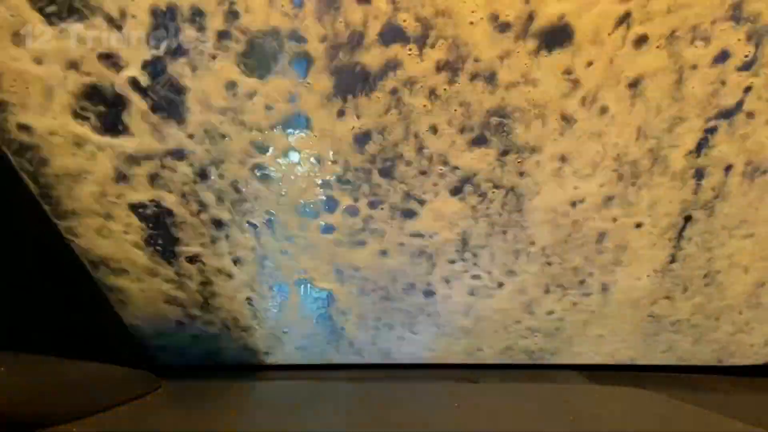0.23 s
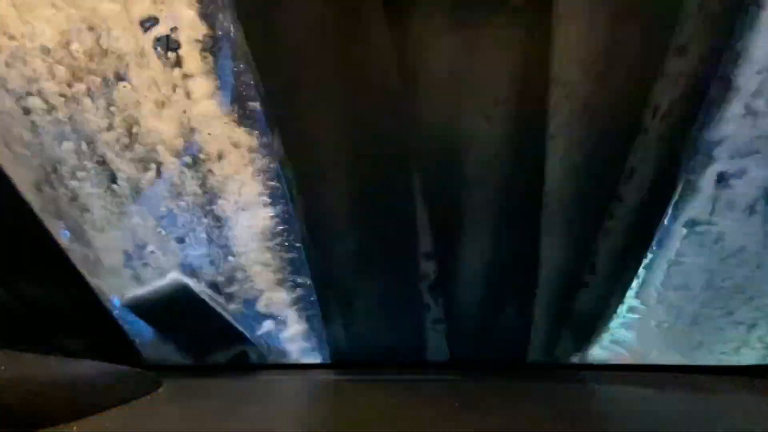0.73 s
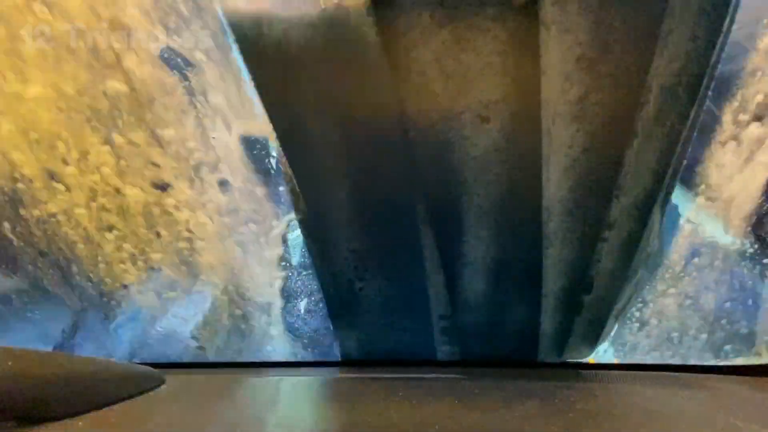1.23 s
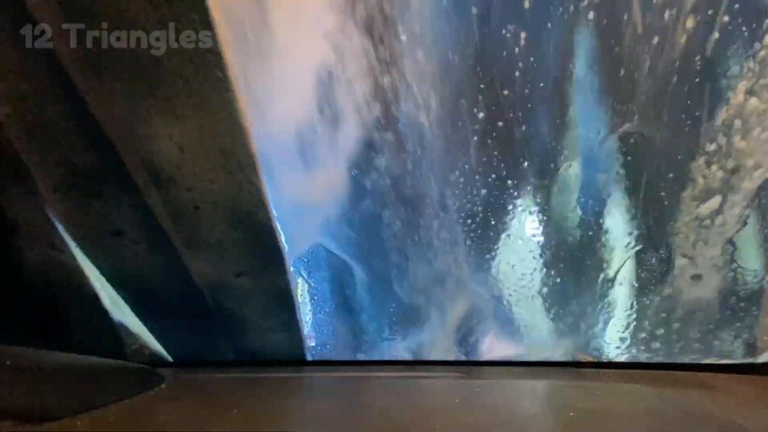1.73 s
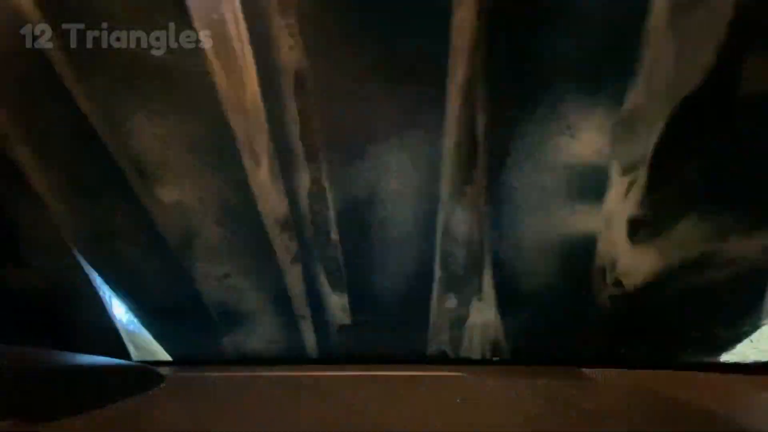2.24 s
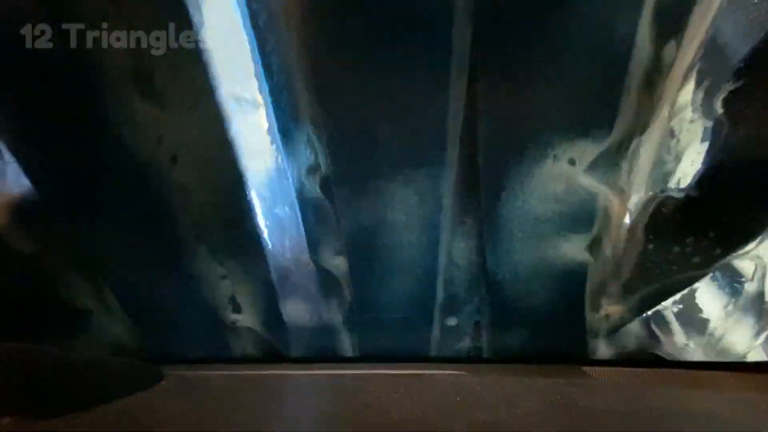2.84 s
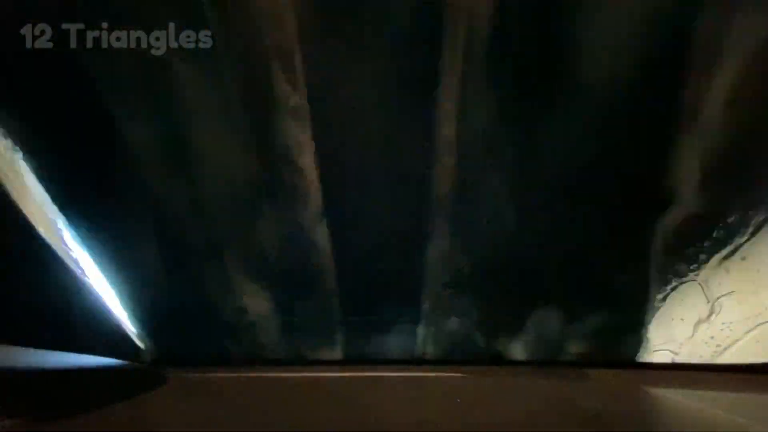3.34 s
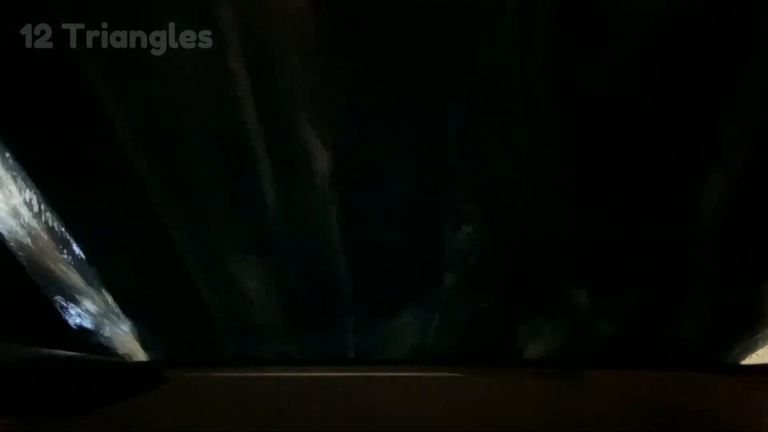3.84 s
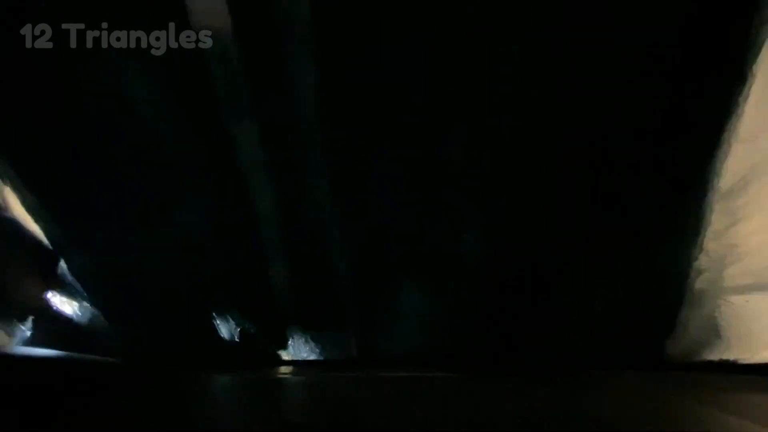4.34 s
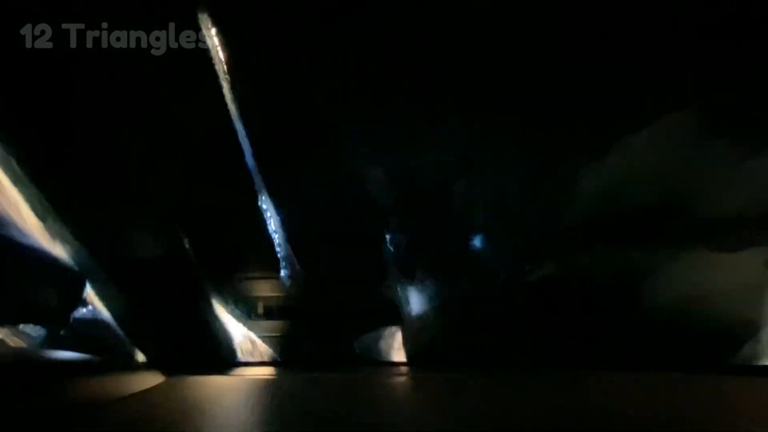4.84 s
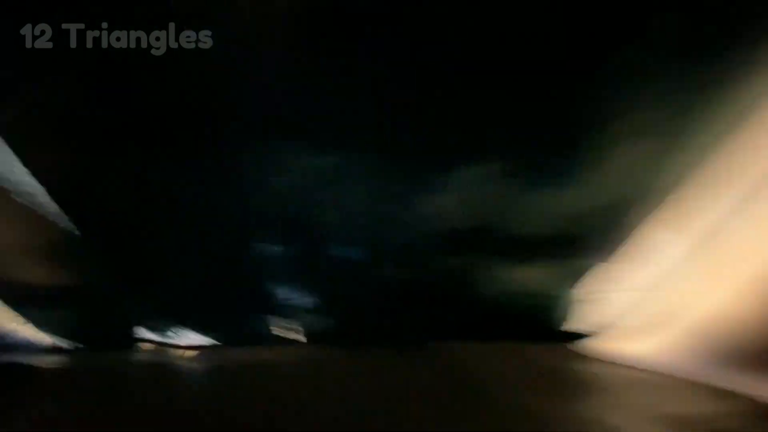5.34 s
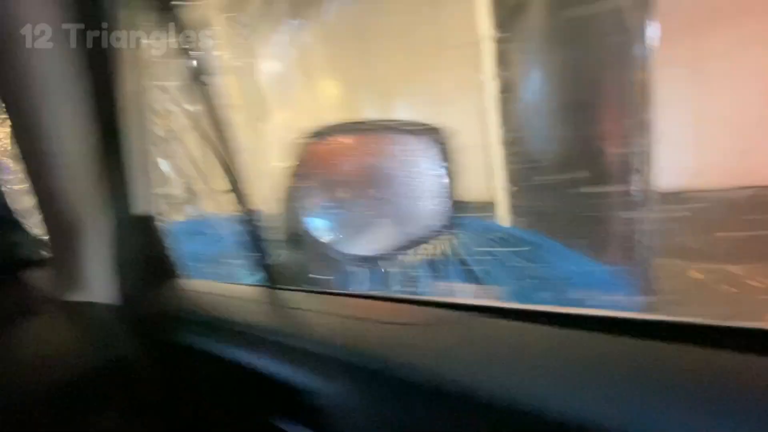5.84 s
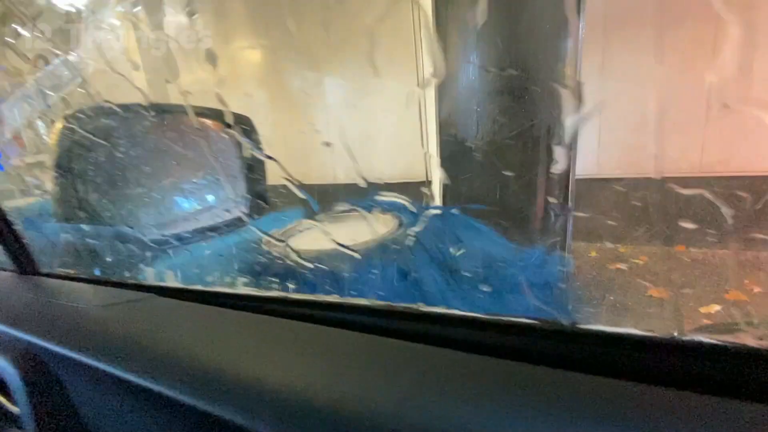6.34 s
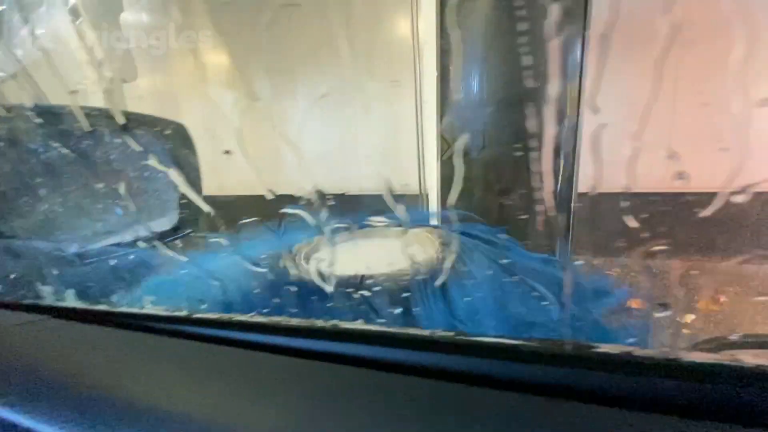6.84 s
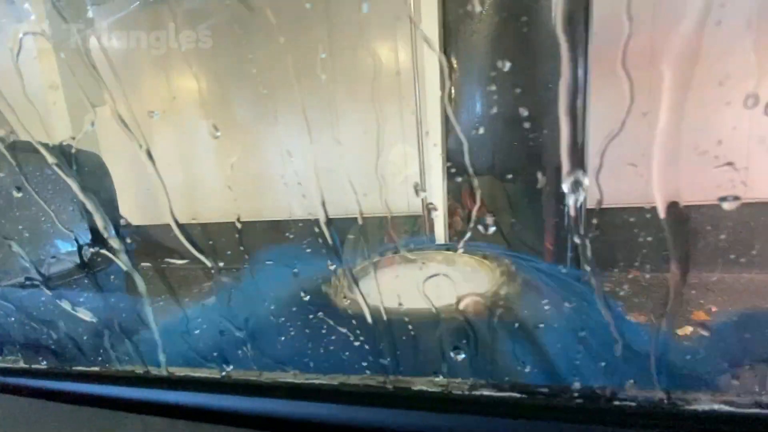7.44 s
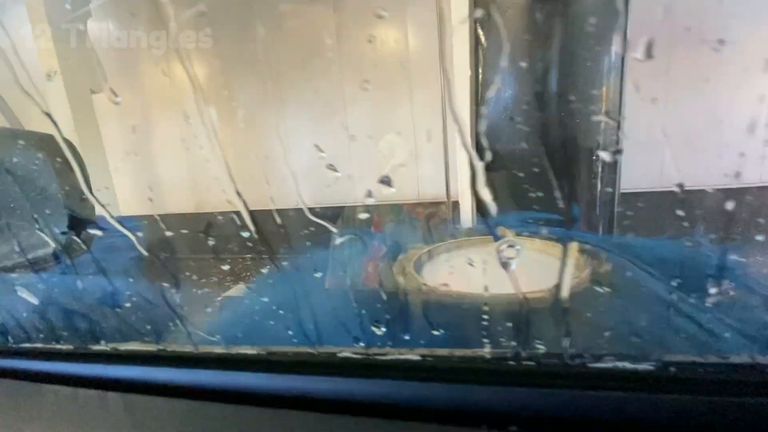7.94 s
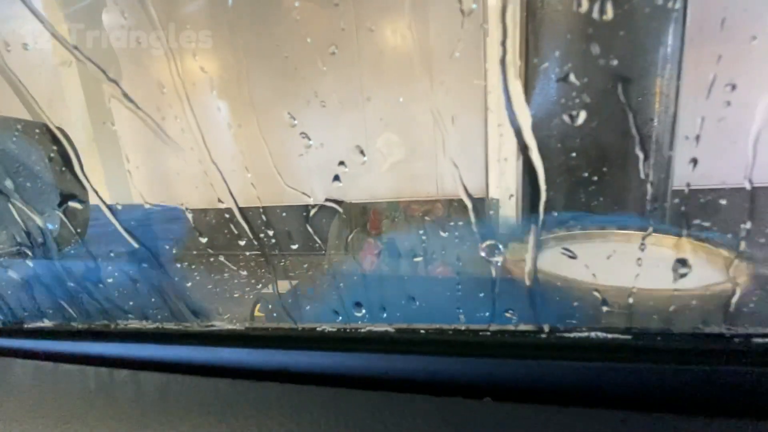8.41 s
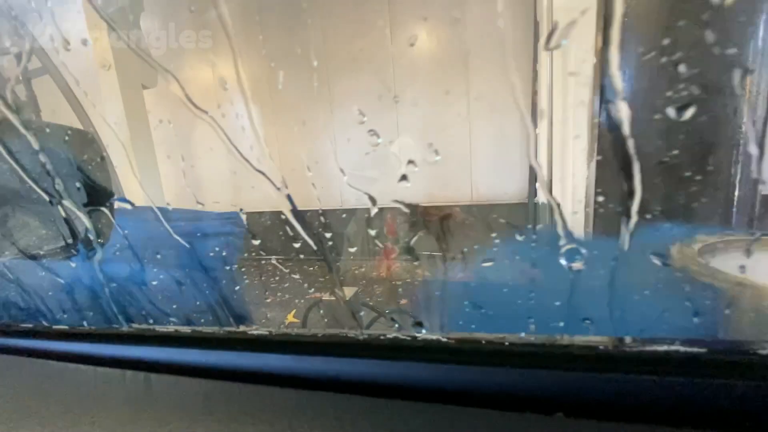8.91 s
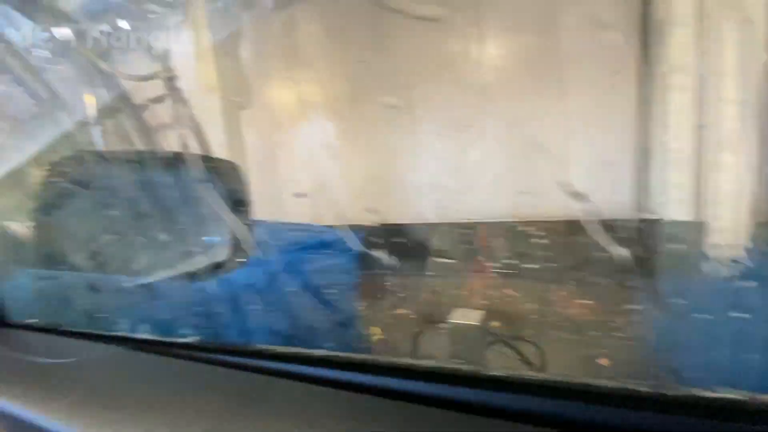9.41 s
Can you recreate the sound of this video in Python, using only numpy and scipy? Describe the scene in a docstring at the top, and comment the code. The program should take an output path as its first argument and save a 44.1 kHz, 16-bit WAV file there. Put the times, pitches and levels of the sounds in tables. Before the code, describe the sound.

From the front seat of a closed car in a tunnel car wash: muffled falling water and a faint motor whine. Heavy wet cloth strips thud onto glass and roof, smack and drag through fizzing foam, then thin out to small flicks, swishes and low roof growls. A side brush rubs the front wing with a rising hollow tone, then drums, booms and scrubs on the door, growing to a loud peak near the end.

```python
"""A drone and falling water, dulled by a closed car in a tunnel car wash: filtered noise and a wavering sine.
Heavy wet cloth strips drag in foam (noise and droplet bursts), thud (falling sweeps) and smack (noise bursts);
flicks crack on the glass, sliding cloth swishes up in pitch and the roof growls.
A side brush then rubs the front wing (two rising resonances) and drums on the door, 520 strand strikes a second,
with booming, hissing and scrubbing that briefly swells (short noise bursts)."""
import sys
import numpy as np
from scipy import signal
from scipy.fft import rfft, irfft, next_fast_len
from scipy.io import wavfile
from scipy.ndimage import uniform_filter1d

SR = 44100
rng = np.random.default_rng(int(sys.argv[2]) if len(sys.argv) > 2 else 0)


def wav_record(signal):
    """Record a signal, one row per channel, as 16-bit PCM in the file named by sys.argv[1]."""
    frames = np.transpose(np.atleast_2d(signal))
    bounded = np.clip(frames, -1, 1)
    # unit amplitude maps onto the largest positive 16-bit level
    quanta = np.round(bounded * 32767).astype(np.int16)
    wavfile.write(sys.argv[1], SR, quanta)


N = 426447
TIME = np.arange(N) / SR
PADDED = next_fast_len(N + 8192)
BINS_HZ = np.maximum(np.arange(PADDED // 2 + 1) * SR / PADDED, 1)

# Water falling in the tunnel, base level: (time [s], level [dB])
WATER_LEVEL = [(0.0, -50), (0.44, -44), (1.63, -41.5), (2.61, -45), (3.04, -47.5), (3.57, -46.5),
               (5.29, -46), (5.55, -51), (5.95, -50), (6.17, -48), (6.9, -46.5)]
# Drag of the strips on the car, base level: (time [s], level [dB])
DRAG_LEVEL = [(0.0, -51), (0.25, -37), (0.38, -38.5), (0.88, -34), (1.54, -34), (2.4, -42.5), (2.71, -41),
              (4.23, -56), (4.57, -52.5), (4.78, -66), (5.35, -54), (5.55, -54.5), (5.92, -53.5),
              (6.05, -47), (6.25, -49.5), (6.69, -50.5), (6.9, -48)]
# Thin high hiss, base level: (time [s], level [dB])
HISS_LEVEL = [(0, -68.5), (1.53, -67), (2.35, -69), (2.72, -61.5), (3.32, -67.5), (3.85, -64), (4.0, -54.5),
              (4.06, -69.5), (4.5, -66.5), (4.72, -58), (4.85, -68), (6.6, -68), (9.67, -72)]
# Wet cloth meeting glass: (time [s], clap level [dB], spray level [dB], length [s])
SMACK_EVENTS = [(0.211, -26.5, -36.5, 0.036), (0.225, -26.5, -35.5, 0.036), (0.3208, -26.5, -33, 0.0083),
                (0.749, -18.5, -25, 0.026), (0.807, -20.5, -47, 0.026), (1.298, -24.5, -44, 0.0078),
                (1.393, -21, -28, 0.016), (1.405, -26.5, -29.5, 0.033), (1.435, -16.5, -30.5, 0.023),
                (1.454, -23, -31, 0.044), (1.549, -18.5, -30.5, 0.016), (1.79, -34, -39, 0.017),
                (1.917, -18.5, -30, 0.011), (1.927, -27, -32.5, 0.044), (2.005, -40, -31.5, 0.01),
                (2.071, -34, -45, 0.0088), (2.083, -46, -52, 0.05), (2.155, -37, -45, 0.02),
                (2.176, -24.5, -23, 0.005), (2.676, -27.5, -32, 0.027), (2.692, -34.5, -46.5, 0.14),
                (2.847, -40.5, -48, 0.045), (3.201, -33.5, -41, 0.043), (3.389, -29.5, -38.5, 0.031),
                (3.896, -39, -56, 0.15), (3.952, -37.5, -56, 0.021), (4.126, -36.5, -58, 0.014),
                (4.251, -41, -43, 0.065), (4.532, -39, -62, 0.013), (4.628, -34, -42.5, 0.018),
                (5.045, -36.5, -80, 0.17), (5.353, -44.5, -53, 0.02), (6.206, -36.5, -52, 0.044),
                (6.593, -41, -48.5, 0.024), (6.635, -41, -50, 0.016), (8.245, -34, -34, 0.048),
                (8.877, -34, -40, .03)]
# Strips landing on glass and roof, and (from 7 s) the side brush's first heavy blows on the door: (time [s],
# level [dB], first pitch [Hz], panel pitch [Hz], length [s])
THUD_EVENTS = [(0.212, -24, 885, 618, 0.032), (0.249, -5, 208, 59, 0.028), (0.321, -25.5, 690, 110, .015),
               (0.539, -21, 307, 144, 0.029), (0.75, -6.5, 1280, 58.4, 0.042),
               (1.101, -20, 324, 225, 0.015), (1.302, -22, 1133, 920, 0.0099),
               (1.404, -13, 403, 177, 0.033), (1.439, -11.5, 976, 134, 0.018),
               (1.476, -12.5, 298, 58, 0.04), (1.547, -22.5, 1464, 60.3, 0.1), (1.93, -26, 1490, 92, 0.041),
               (2.675, -15.5, 710, 397, 0.011), (2.69, -26, 400, 179, 0.026),
               (2.711, -23, 198, 41.7, 0.097), (3.379, -21, 150, 51, 0.01), (5.433, -27, 1190, 49, 0.018),
               (5.712, -27, 970, 42, 0.037), (7.031, -13.5, 484, 73, 0.026), (7.098, -7, 292, 46, 0.017)]
# Water and cloth hems flicking the glass: (time [s], level [dB], tilt above 1500 Hz [dB/octave])
FLICK_EVENTS = [(0.322, -36, -9), (0.807, -14, -7), (.858, -39.5, -4.5), (1.069, -38, -4),
                (2.03, -36, -7.5), (2.175, -32.5, -5), (3.233, -42.5, 6), (3.396, -34, 10),
                (4.254, -25, 18.5), (4.304, -33, 15), (4.634, -39.5, 11), (5.274, -47, -4),
                (5.623, -43, -4.5), (7.186, -38.5, -6), (7.68, -33, -8), (8.238, -26, -4.5),
                (8.325, -30, -6), (8.876, -28, -5.5), (8.962, -27, -8), (9.638, -30, -5.5)]
# Cloth sliding over wet glass: (time [s], level [dB], length [s], first pitch [Hz], last pitch [Hz])
SWISH_EVENTS = [(2.545, -52, 0.095, 1700, 2020), (2.64, -45, 0.025, 1890, 2090),
                (3.337, -48, 0.047, 2000, 2470), (3.91, -55, 0.11, 1650, 1790),
                (4.06, -53.5, 0.067, 1600, 1950), (4.52, -49, 0.02, 1670, 1980),
                (4.565, -47, 0.032, 1590, 1910), (4.716, -56, 0.039, 1620, 2110),
                (5.058, -50.5, 0.17, 1000, 2140), (5.658, -60, 0.38, 1650, 1950),
                (6.418, -54, 0.084, 1197, 1830)]
# Cloth stuttering on the roof: (time [s], level [dB], mean pitch [Hz], length [s])
GROAN_EVENTS = [(3.512, -32, 51.7, 0.23), (3.907, -30.5, 100, 0.061), (5.093, -26.5, 45.4, 0.12),
                (6.084, -33, 63.4, 0.081), (6.72, -30, 135.2, 0.4)]
# Brush rubbing the front wing: (time [s], level [dB])
WING_LEVEL = [(5.93, -75), (6.04, -46), (6.24, -39.5), (6.42, -50.5), (6.6, -41), (6.9, -40.5),
              (7.04, -32.5), (7.45, -36), (7.64, -33), (7.85, -39), (8.3, -70)]
# Brief swells in the brush's scrubbing: (time [s], level [dB])
SCRUB_SWELL_EVENTS = [(7.303, -23), (7.454, -24), (7.627, -19), (7.692, -24), (7.919, -22), (8.101, -23),
                      (8.208, -17.5), (8.51, -15), (9.132, -21), (9.152, -21), (9.349, -21), (9.467, -19)]

# Filter shapes, all: (frequency [Hz], relative gain [dB])
RUMBLE_SHAPE = [(20, -25), (36, -25), (52, 10.5), (75, 0.5), (110, -6.5), (170, -10), (400, -58)]  # car body
WASH_SHAPE = [(150, -4.5), (340, -12), (450, 1), (520, -1), (630, 5.5), (730, -4.5), (950, -2.5),
              (1100, -7), (1340, -18), (1560, -8.5), (1900, -30.5), (2800, -59), (6000, -53)]  # falling water
RUB_SHAPE = [(60, -1), (120, 3.5), (200, 1), (270, 1), (335, -3), (420, 4), (540, -11.5), (900, -11.5),
             (2000, -53.5)]  # cloth on panels, and the knock of a thud
FIZZ_SHAPE = [(700, 5), (1500, 1), (2400, 5.5), (3700, 3), (5000, 0.5), (6500, -5), (7700, -15.5),
              (11000, -49), (14000, -40)]  # foam
THIN_SHAPE = [(5000, -15), (7750, -17.5), (8150, -0.5), (9000, -3.5), (10200, -7.5), (11500, -14),
              (12800, -33), (15000, -30)]  # high hiss
SMACK_SHAPE = [(80, 3), (250, 0.5), (450, -2.5), (650, 6), (800, 0.5), (1020, 2), (1350, -11), (2200, -21),
               (5000, -51)]  # cloth clap
SPRAY_SHAPE = [(600, -20), (1500, 6), (2000, -0.5), (3500, -2), (5500, -10), (7600, -20), (9000, -19.5),
               (11500, -33), (14000, -58)]  # squeezed-out drops
FLICK_SHAPE = [(400, -19), (1200, -6.5), (2800, 2.5), (5800, 1), (7600, -3.5), (8600, 3), (11000, -10),
               (13000, -32), (15000, -22)]  # cracks, before the tilt
BOOM_SHAPE = [(18, -16), (30, -27), (45, 5), (62, 2.5), (80, 6), (100, 1), (130, -38), (250, -33),
              (600, -95)]  # lowest door modes
DOOR_SHAPE = [(50, -43), (85, 0), (120, 4), (155, 6), (192, 0), (245, 7), (275, 0), (315, -12), (420, -16),
              (700, -40), (2000, -100)]  # drummed door
SCRUB_SHAPE = [(30, -43), (200, -21), (320, -1), (390, 3), (460, 4.5), (525, 0.5), (640, 4), (770, -6.5),
               (900, -5), (1080, -9), (1450, -22.5), (3000, -79), (9000, -94)]  # strands on the door
BRUSH_SPRAY_SHAPE = [(700, -1.5), (1500, 2.5), (2100, 2), (3400, -1.5), (4800, -5), (5700, -14.5),
                     (6800, -13), (7800, -23), (11500, -25), (14000, -50)]  # wet strand tips

# Side against mid: (frequency [Hz], gain [dB])
WIDTH = [(500, -60), (800, -26), (1100, -13), (1350, -6), (1800, -3.5)]
# Left against right channel: (frequency [Hz], left minus right [dB])
BALANCE = [(650, 0), (1000, 1), (2800, 2), (5000, 1), (7000, -2), (8500, -10), (11000, -7), (13000, 0)]
# Pitch above which the stereo image widens: (time [s], frequency [Hz])
SPREAD_FROM = [(2.0, 754), (2.5, 472), (2.9, 356), (3.15, 356), (3.5, 790), (8.6, 866), (9.2, 510),
               (9.67, 370)]
# Further phase lead of left over right: (frequency [Hz], lead [rad])
TREBLE_LEAD = [(1200, 0), (1480, 1), (2100, 4), (2750, 1), (3800, -1.6), (4800, 1), (6600, 4.1),
               (7400, 4.6), (8100, 7.3), (9300, 7.3), (10300, 4.6)]

SPREAD_RAD, CUTOFF_HZ = 2.1, 15200
MOTOR_HZ, MOTOR_DB = 582.3, -57  # centre values
# Longer contact, softer start: least rise, added rise at the typical length
SHARPEST_S, RISE_S, TYPICAL_S = 0.0016, 0.0011, 0.036
FLICK_S = 0.006
# Level at the usual drag, and share of the drag's dB swing
USUAL_DRAG_DB = -44
FIZZ_DB, FIZZ_SHARE = -56.5, 0.89
RUMBLE_DB, RUMBLE_SHARE = -46.5, 0.15
WING_START_HZ, WING_END_HZ = 608, 676
# Brush touches the door, leans to full weight, comes abreast, slides off
ARRIVAL_S, GRAZE_S, LEAN_S, ABREAST_S, LEAVING_S = 6.85, 0.15, 0.2, 9.14, 9.2
LEAVING_FADE_DB_PER_S = 9.5  # boom, rasp and whine
# Base level abreast [dB], loss per squared second away from abreast [dB/s^2]
BRUSH_BOOM, BRUSH_DRUM = (-19, 6.5), (-19.5, 1.64)
BRUSH_SCRUB, BRUSH_HISS = (-25.5, 2.6), (-42, 1.2)
# Throb of the lopsided brush: rate, a moment of greatest pressure, depth
THROB_HZ, THROB_PEAK_S, THROB_DB = 7.65, 9.195, 1.3


def from_db(db):
    """Decibels to gain."""
    return 10 ** (np.asarray(db) / 20)


def rms_one(x):
    """Scale to unit power."""
    return x / np.sqrt(np.mean(x ** 2) + 1e-20)


def gain_curve(rows):
    """Gain over time, interpolated in dB."""
    s, db = np.transpose(rows)
    return from_db(np.interp(TIME, s, db))


def at_hz(points, hz):
    """Read a curve on a log-frequency axis."""
    f, value = np.transpose(points)
    return np.interp(np.log(hz), np.log(f), value)


def colour(x, shape):
    """Filter by a fixed shape."""
    return irfft(rfft(x, PADDED) * from_db(at_hz(shape, BINS_HZ)), PADDED)[..., :N]


def sine(hz):
    """Sine of moving frequency."""
    return np.sin(2 * np.pi * np.cumsum(hz) / SR)


def drift(rate_hz):
    """Smooth random curve of unit rms: noise through two equal poles at rate_hz."""
    r = np.exp(-80 * np.pi * rate_hz / SR)  # runs at SR / 40
    white = rng.standard_normal(N // 40 + 2002)
    slow = signal.lfilter([1], [1, -2 * r, r * r], white)[2000:]
    return np.interp(np.arange(N) / 40, np.arange(len(slow)), rms_one(slow))


def noise():
    """Two unrelated white noises."""
    return rng.standard_normal((2, N))


def stereo(pair, shape):
    """Two sounds as mid and side, narrow in the bass and wide in the treble; unit rms."""
    mid = colour(pair[0], shape)
    side = colour(colour(pair[1], shape), WIDTH)
    return rms_one(np.array([mid + side, mid - side]))


def low_pass(x, hz):
    """Second-order Butterworth low-pass."""
    return signal.sosfilt(signal.butter(2, hz, fs=SR, output="sos"), x)


def droplets(per_s, spread_db, share):
    """Bursts of uneven size, power decaying over 1 ms, mixed with smooth hiss by power share."""
    sizes = from_db(spread_db * np.minimum(rng.exponential(1, N), 4))
    hits = (rng.random(N) < per_s / SR) * sizes ** 2 + 1e-18
    power = signal.lfilter([1], [1, -np.exp(-1000 / SR)], hits)
    share = np.clip(share, 0, 1)
    return noise() * np.sqrt(1 - share + share * power / power.mean())


def burst(t, rise_s, length_s, cabin_db=-17, cabin_t60_s=0.2):
    """A contact swells and dies with a Gaussian fall; the padded cabin adds a tail."""
    tail = from_db(cabin_db - 60 * t / cabin_t60_s)
    return (1 - np.exp(-t / rise_s)) * np.hypot(np.exp(-(t / length_s) ** 2), tail)


def add(track, s, sound):
    """Mix a sound in at a time."""
    start = round(s * SR)
    track[..., start:start + sound.shape[-1]] += sound[..., :N - start]


def following_drag(db, share):
    """Gain that takes a share of the drag's dB swing."""
    return from_db(db) * (gain_curve(DRAG_LEVEL) / from_db(USUAL_DRAG_DB)) ** share


def tunnel(wash_db=2.5, surge_db=1.0):
    """Body rumble, falling water dulled by the closed body, and a wavering motor whine."""
    rumble = following_drag(RUMBLE_DB, RUMBLE_SHARE) * rms_one(colour(rng.standard_normal(N), RUMBLE_SHAPE))
    surge = from_db(wash_db + surge_db * drift(16))
    water = surge * gain_curve(WATER_LEVEL) * stereo(noise(), WASH_SHAPE)
    whine = from_db(MOTOR_DB + 3.5 * drift(4)) * sine(MOTOR_HZ + 15 * drift(22))
    return rumble + water + whine


def dragging(rub_db=1, hiss_db=6.0):
    """Cloth sticks and slides on panels as foam bursts; one random grip flutters rub, foam and hiss."""
    grip = from_db(1.5 * drift(9))
    rub = from_db(rub_db) * gain_curve(DRAG_LEVEL) * stereo(noise(), RUB_SHAPE)
    foam = following_drag(FIZZ_DB, FIZZ_SHARE) * stereo(droplets(1000, 1.0, 0.19), FIZZ_SHAPE)
    hiss = from_db(hiss_db) * gain_curve(HISS_LEVEL) * stereo(droplets(450, 2.4, 0.51), THIN_SHAPE)
    return grip * (rub + foam + hiss)


def crackle(spread_db, ring_s, count=24000):
    """Bursting drops and foam cells: tiny decaying pings, each with its own pitch, size and side."""
    when, pitch, size, side = rng.random((count, 4)).T
    t = TIME[:SR // 250]
    hz = 900 + 11000 * pitch[:, None]
    pings = from_db(spread_db * size[:, None]) * np.exp(-t / ring_s) * np.sin(2 * np.pi * hz * t)
    at = (when * N).astype(int)[:, None] + np.arange(len(t))

    def mix(weight):
        """Sum the weighted pings at their times."""
        return rms_one(np.bincount(at.ravel(), (pings * weight).ravel(), N)[:N])

    return np.array([mix(1), mix(side[:, None] - 0.5)])  # mid, side


def smacks(snap=0.57, snap_s=0.007, mist_db=-4):
    """Wet cloth claps on the glass fold by fold and squeezes out a crackling spray."""
    clap, spray, t = np.zeros(N), np.zeros(N), TIME[:SR // 3]
    for s, clap_db, spray_db, length_s in SMACK_EVENTS:
        rise_s = SHARPEST_S + RISE_S * (length_s / TYPICAL_S) ** 2
        shape = burst(t, rise_s, length_s)
        # the leading edge lands hardest
        add(clap, s, from_db(clap_db) * shape * (1 + snap * np.exp(-t / snap_s)))
        add(spray, s, from_db(spray_db) * shape)
    folds = rms_one(from_db(1.5 * drift(130)))
    drops = crackle(spread_db=16, ring_s=0.0012) + from_db(mist_db) * noise()
    return folds * (clap * stereo(noise(), SMACK_SHAPE) + spray * stereo(drops, SPRAY_SHAPE))


def thuds(spread_s=0.00452, knock_db=-12):
    """High bending waves run faster: each blow sweeps down towards the panel's note."""
    out, blows, t = np.zeros(N), np.zeros(N), TIME[:SR // 3]
    for s, db, first_hz, panel_hz, length_s in THUD_EVENTS:
        hz = panel_hz + (first_hz - panel_hz) / (1 + t / spread_s) ** 2
        swell = from_db(db) * burst(t, 0.0038, length_s, cabin_db=-23, cabin_t60_s=0.96)
        add(out, s, swell * sine(hz))
        add(blows, s, swell * first_hz / 1000)
    # the many higher panel modes blur into a dull knock
    return out + from_db(knock_db) * blows * rms_one(colour(rng.standard_normal(N), RUB_SHAPE))


def flicks():
    """Water and hems crack on the glass: short noise bursts, each with its own treble tilt."""
    out, t = np.zeros((2, N)), TIME[:SR // 5]
    hz = np.maximum(np.fft.rfftfreq(len(t), 1 / SR), 1)
    octaves = np.log2(np.maximum(hz / 1500, 1))
    for s, db, tilt_db in FLICK_EVENTS:
        tone = from_db(at_hz(FLICK_SHAPE, hz) + tilt_db * octaves)
        mid, side = rfft(rng.standard_normal((2, len(t)))) * tone
        side = side * from_db(at_hz(WIDTH, hz))
        crack = rms_one(irfft(np.array([mid + side, mid - side]), len(t)))
        add(out, s, from_db(db) * crack * burst(t, 0.0009, FLICK_S, cabin_db=-9, cabin_t60_s=0.1))
    return out


def swishes(width=0.33, catch_db=5.5):
    """A strip slides faster and louder, catching as it goes, until its hem slips off: rising noise bands."""
    out = np.zeros((2, N))
    for s, db, length_s, first_hz, last_hz in SWISH_EVENTS:
        along = np.linspace(0, 1, round(length_s * SR))
        friction = low_pass(rng.standard_normal((2, SR)), width * first_hz)[:, :len(along)]
        phase = 2 * np.pi * np.cumsum(first_hz + (last_hz - first_hz) * along) / SR
        swell = np.sqrt(np.interp(along, [0, 0.7, 1], [0, 1, 0]))
        add(out, s, from_db(db) * swell * rms_one(friction * np.cos(phase)))
    return out * from_db(catch_db * np.tanh(drift(70)))


def groans(waver=0.114):
    """Slow, uneven stick and slip makes the roof growl: low sines of wavering pitch and level."""
    out, t = np.zeros(N), TIME[:SR]
    for s, db, hz, length_s in GROAN_EVENTS:
        growl = sine(hz * (1 + waver * drift(25)[:len(t)]))
        add(out, s, from_db(db) * burst(t, length_s / 2, length_s) * growl)
    return out * from_db(4 * np.tanh(drift(25)))


def wing(half_width_hz=58, lower_ratio=0.74, lower_db=-5):
    """The rubbed front wing sings in two broad resonances, rising as the brush nears the door."""
    hz = np.interp(TIME, [WING_LEVEL[0][0], WING_LEVEL[-1][0]], [WING_START_HZ, WING_END_HZ])
    phase = 2 * np.pi * np.cumsum(hz) / SR
    # slow complex noise on a carrier is a noise band
    upper, lower = low_pass(noise() + 1j * noise(), half_width_hz)
    upper = upper * np.exp(1j * phase)
    lower = from_db(lower_db) * lower * np.exp(1j * lower_ratio * phase)
    return gain_curve(WING_LEVEL) * from_db(1.5 * drift(8)) * rms_one((upper + lower).real)


def strands(per_s, uneven_db):
    """Loosely spaced tip strikes of uneven force, each spread by the door as a falling bending wave."""
    jitter, force, sign = rng.standard_normal((10000, 3)).T
    at = ((np.arange(len(jitter)) + jitter) * SR / per_s).astype(int)
    inside = (at >= 0) & (at < N)
    strikes = from_db(uneven_db * force) * np.sign(sign)
    clicks = np.bincount(at[inside], strikes[inside], N)
    t = TIME[:SR // 25]
    sweep = sine(50 + 1500 / (1 + t / 0.00223) ** 2) * np.exp(-t / 0.0055)
    # only the phase of the sweep: delay without colour
    delay = np.exp(1j * np.angle(rfft(sweep, PADDED)))
    return irfft(rfft(clicks, PADDED) * delay, PADDED)[:N]


def passing(db, loss_db):
    """Gain of a brush sound: its dB falls with the square of the time from abreast."""
    return from_db(db - loss_db * (TIME - ABREAST_S) ** 2)


def brush(motor_db=-12, lurch_db=0.5):
    """Strands drum on the door and boom its lowest modes; wet tips scrub and hiss; a motor whines."""
    tips, far_tips, bunching = strands(520, 1.7), strands(700, 1.7), drift(25)
    leaving = from_db(-LEAVING_FADE_DB_PER_S * np.maximum(TIME - LEAVING_S, 0))
    scrub = passing(*BRUSH_SCRUB) * leaving
    # the heavy door sways at a fairly even height
    sway = colour(tips, BOOM_SHAPE)
    sway = rms_one(sway / np.sqrt(uniform_filter1d(sway ** 2, size=SR // 12) + 1e-12))
    boom = passing(*BRUSH_BOOM) * leaving * from_db(lurch_db * drift(2.7)) * sway
    drum = passing(*BRUSH_DRUM) * from_db(0.085 * bunching) * rms_one(colour(tips, DOOR_SHAPE))
    rasp = scrub * from_db(0.5 * bunching) * stereo([tips, far_tips], SCRUB_SHAPE)
    spray = stereo(droplets(640, 1.7, 0.05), BRUSH_SPRAY_SHAPE)
    hiss = passing(*BRUSH_HISS) * from_db(1.35 * bunching) * spray
    whine = from_db(motor_db + 2 * drift(0.34)) * scrub * sine(MOTOR_HZ + 3 * drift(11.2))
    # outer strands graze the door before the bulk leans on it
    graze = np.clip((TIME - ARRIVAL_S) / GRAZE_S, 0, 1)
    lean = np.clip((TIME - ARRIVAL_S) / LEAN_S, 0, 1) ** 4
    throb = from_db(THROB_DB * np.cos(2 * np.pi * THROB_HZ * (TIME - THROB_PEAK_S)))
    return lean * throb * (boom + drum) + graze * (rasp + hiss + whine)


def scrub_swells(length_s=0.0063):
    """The brush's scrubbing swells briefly: short scrub-coloured noise bursts."""
    swell = np.zeros(N)
    for s, db in SCRUB_SWELL_EVENTS:
        add(swell, s, from_db(db) * burst(TIME[:SR // 5], SHARPEST_S, length_s))
    return swell * stereo(noise(), SCRUB_SHAPE)


def cabin(x, echo_db=-10, count=24):
    """Windows and dashboard throw back early treble echoes, different in left and right."""
    echoes = np.zeros((2, PADDED))
    for channel in echoes:
        lags = (rng.uniform(0.001, 0.014, count) * SR).astype(int)
        channel[lags] = rng.choice([-1, 1], count) / np.sqrt(count)
    share = from_db(echo_db) / np.hypot(1, (1100 / BINS_HZ) ** 8)
    response = (1 + share * rfft(echoes)) / np.hypot(1, share)
    return irfft(rfft(x, PADDED) * response, PADDED)[:, :N]


def spread(x, size=512):
    """The stereo image widens above a moving pitch, by a phase lead of left over right."""
    hz, s, frames = signal.stft(x, SR, nperseg=size)
    hz = np.maximum(hz, 1)[:, None]
    above = np.log2(hz / np.interp(s, *np.transpose(SPREAD_FROM))) / 0.73  # full at 0.73 octave
    lead = SPREAD_RAD * np.clip(above, 0, 1) ** 2 + at_hz(TREBLE_LEAD, hz)
    turned = frames * np.exp(0.5j * np.array([lead, -lead]))
    return signal.istft(turned, SR, nperseg=size)[1][:, :N]


def scene():
    """Everything as heard from the front seat."""
    wash = tunnel() + dragging()
    strips = smacks() + thuds() + flicks() + swishes() + groans()
    side_brush = wing() + brush() + scrub_swells()
    return cabin(wash + strips + side_brush)


def record(dry):
    """Left and right channels differ in phase and treble level; the top is cut."""
    balance = from_db(at_hz(BALANCE, BINS_HZ) * np.array([[0.5], [-0.5]]))
    balance = balance / np.sqrt(np.mean(balance ** 2, axis=0))
    heard = irfft(rfft(spread(dry), PADDED) * balance, PADDED)[:, :N]
    return signal.sosfilt(signal.cheby2(12, 70, CUTOFF_HZ, fs=SR, output="sos"), heard)


dry = scene()
out = record(dry)
wav_record(out)
```